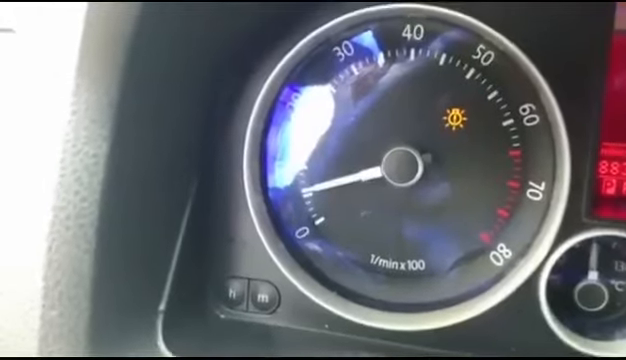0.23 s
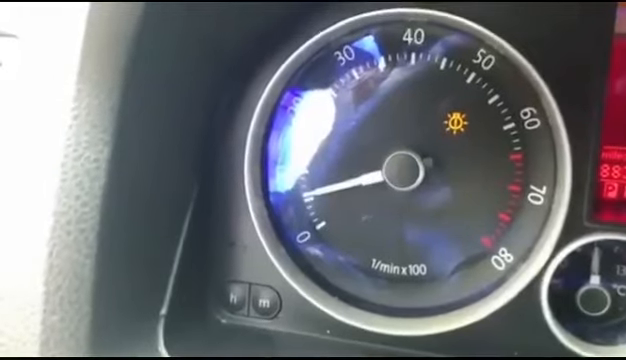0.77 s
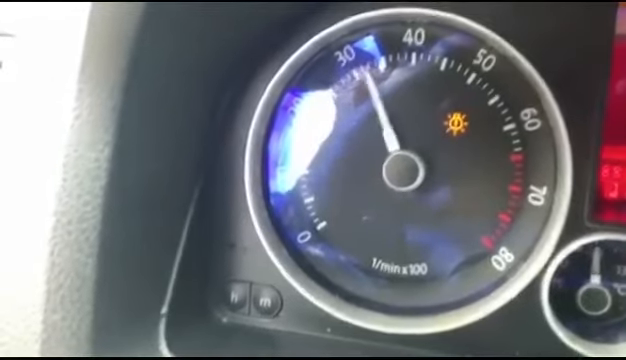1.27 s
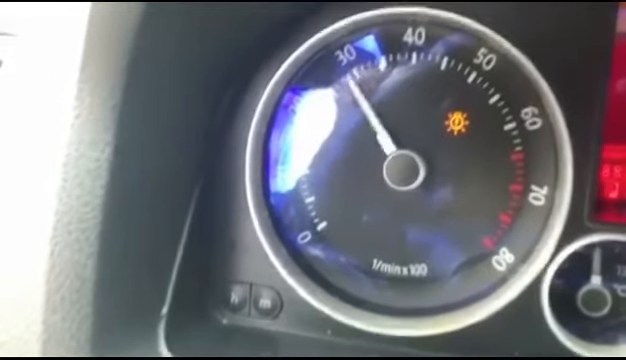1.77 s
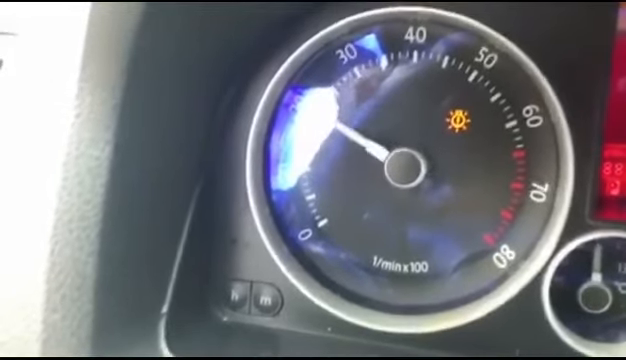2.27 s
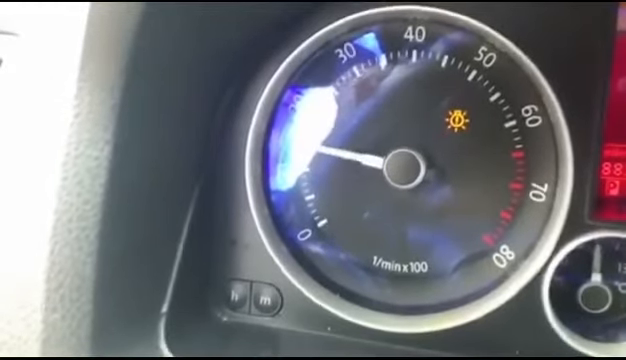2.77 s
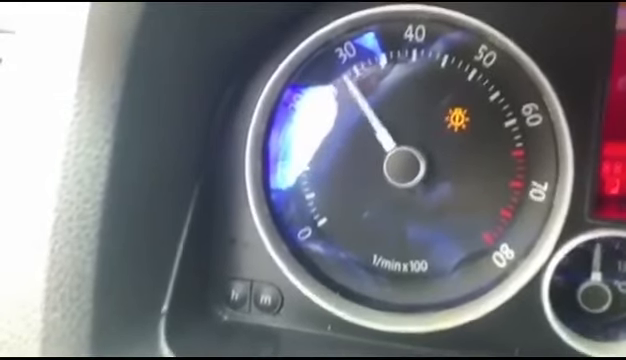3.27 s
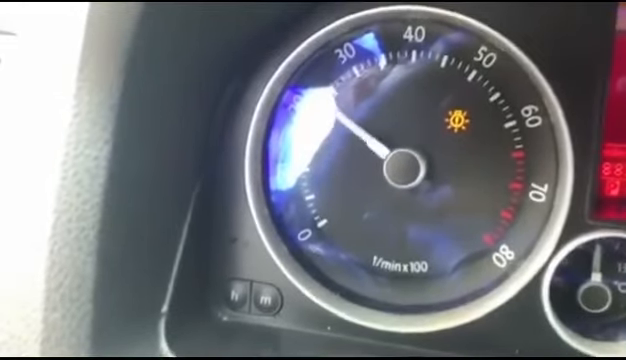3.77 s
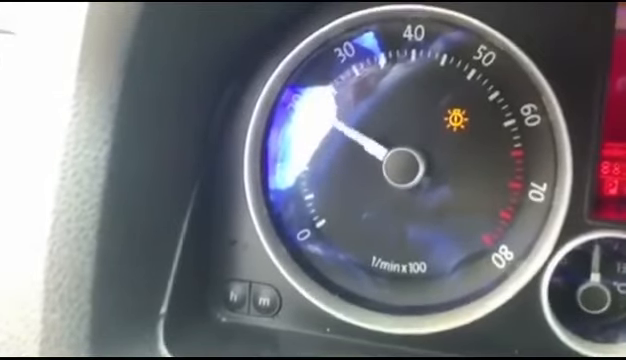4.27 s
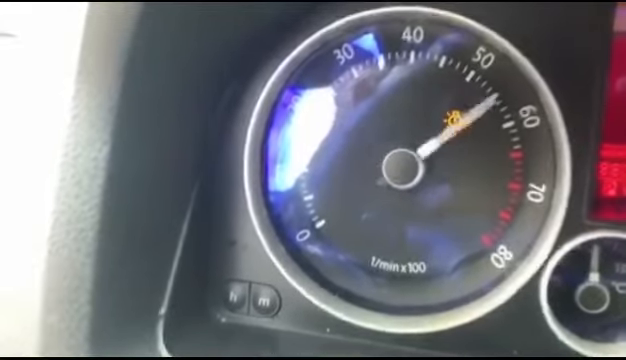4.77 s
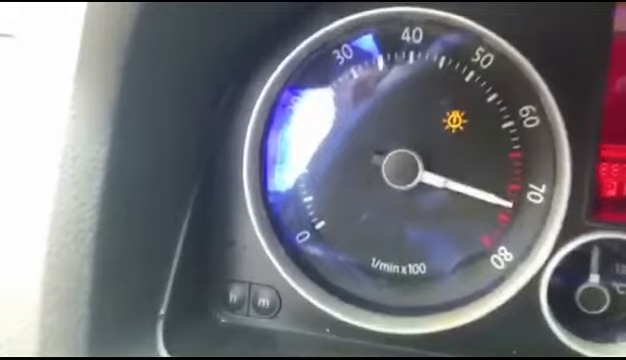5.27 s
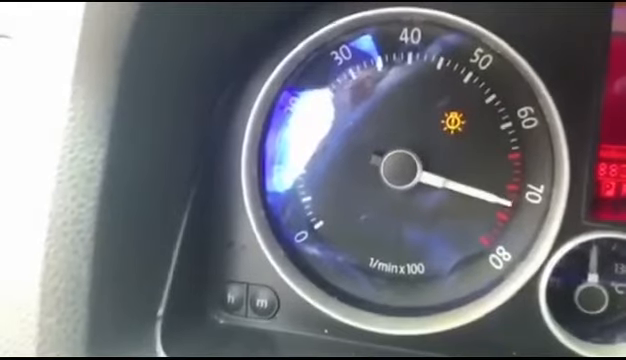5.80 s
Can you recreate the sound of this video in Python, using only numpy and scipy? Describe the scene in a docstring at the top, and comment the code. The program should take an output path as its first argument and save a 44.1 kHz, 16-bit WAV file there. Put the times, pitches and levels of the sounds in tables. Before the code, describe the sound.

Inside a small car cabin, a loud-exhaust six-cylinder engine idles quietly with a low, lumpy bass drone and a soft whirr that fades in the first half second. At about 0.9 s the throttle opens with a faint intake gasp; the note swells and barks up to a raspy peak near 1.4 s, then slides down with dull thumps. At 2.2 s a sharp, bright backfire cracks with a heavy boom. A second, lower blip starts at 3.0 s, peaks around 3.25 s and falls, with soft thuds and a smaller cluster of pops near 3.94 s. From 4.3 s the engine pulls hard, climbing to a loud, high, rasping roar by about 5.1 s. It stays there to the end, fluttering several times a second against the limiter, with bangs and deep thumps around 5.15, 5.34, 5.64 and 5.84 s. The phone microphone rounds the peaks and lacks top treble.

```python
"""First a loud-exhaust six-cylinder car idles around the listener in the driver's seat, under a brief soft whirr.
Two blips follow, then a long pull held at the rev limit to the end. Uneven firings ring the pipe and gas rasps
with them; smooth firing tones and a bass drone fill the cabin, and the intake gasps and growls at each press.
Off throttle and at the limit fuel burns in the exhaust: decaying low tones as soft thumps, noise bursts with
booms as sharp bangs. A phone microphone rounds the peaks and drops the highest treble."""
import sys
import numpy as np
from scipy import signal
from scipy.fft import rfft, irfft, next_fast_len
from scipy.io import wavfile
from scipy.ndimage import uniform_filter1d, map_coordinates

SR = 44100
rng = np.random.default_rng(int(sys.argv[2]) if len(sys.argv) > 2 else 0)


def master_out(mix):
    """Clip the mix to full scale and print it as 16-bit PCM to the path in sys.argv[1]."""
    frames = np.transpose(np.atleast_2d(mix))
    ceiling = np.clip(frames, -1, 1)
    pcm = np.round(ceiling * 32767).astype(np.int16)
    wavfile.write(sys.argv[1], SR, pcm)


N = 266364
T = np.arange(N) / SR


def undb(db):
    """Decibels to gain."""
    return 10 ** (np.asarray(db) / 20)


def unit(x):
    """Scale to rms 1."""
    return x / np.sqrt(np.mean(x ** 2))


def steady(x, size=6000):
    """Hold the running rms at 1, keeping the quick flutter."""
    return x / np.sqrt(np.abs(uniform_filter1d(x * x, size)) + 1e-12)


def walk(rate):
    """Smooth random wander with a spread near 1; a higher rate [Hz] wanders faster."""
    k = max(int(SR / rate), 2)
    once = uniform_filter1d(rng.standard_normal(N), k)
    return unit(uniform_filter1d(once, k))


def drift(x, share, rate):
    """Let the resonances of a noise wander in pitch by the given share."""
    return map_coordinates(x, [np.cumsum(1 + share * walk(rate))], mode="mirror")


def lookup(hz, table):
    """The columns of a table at the given frequencies."""
    at, *columns = np.transpose(table)
    return [np.interp(hz, at, c) for c in columns]


def blend(load, loaded_db, coast_db):
    """Gain of a layer whose level under load takes over from its coasting level."""
    return np.hypot(load * undb(loaded_db), np.clip(1 - load, 0, 1) * undb(coast_db))


def colour(x, points, rings=()):
    """Causal minimum-phase filter with the given spectrum and added narrow resonances."""
    size = 2 * next_fast_len(N // 2 + 16384)
    f = np.arange(size // 2 + 1) * SR / size + 1e-3
    hz, db = np.transpose(points)
    cepstrum = irfft(np.log(undb(np.interp(np.log(f), np.log(hz), db))))
    # folding the cepstrum makes the filter causal
    cepstrum[1:size // 2] *= 2
    cepstrum[size // 2 + 1:] = 0
    peaks = 1 + sum(undb(g) / (1 + 1j * (f * f - c * c) / (f * w)) for c, w, g in rings)
    return irfft(rfft(x, size) * np.exp(rfft(cepstrum)) * peaks)[:N]


def cabin(x, t60, wet_db):
    """Dense, short reflections smear each pulse in time and ripple its spectrum a little."""
    t = T[:SR // 4]
    tail = rng.standard_normal(len(t)) * np.exp(-np.log(1000) * t / t60)
    tail = signal.sosfilt(signal.butter(2, 400, "high", fs=SR, output="sos"), tail)
    size = next_fast_len(N + SR // 2)
    paths = 1 + undb(wet_db) * rfft(tail / np.linalg.norm(tail), size)
    # the square root softens the spectral ripple; the phase keeps the full smear
    ripple = unit(np.abs(paths) ** .5)
    return irfft(rfft(x, size) * ripple * np.exp(1j * np.angle(paths)), size)[:N]


# presses of the pedal: (touched [s], throttle wide [s], top speed reached [s], lifted [s],
# release before each layer's share [s], top firing rate [Hz], gas flow [dB], engine note [dB])
PRESSES = [(0.93, 1.165, 1.378, 1.39, .07, 169, 1.2, -1), (2.99, 3.085, 3.24, 3.255, .155, 144, 1.3, 1),
           (4.29, 4.375, 5.14, 6.1, .1, 358, 0, 0)]
IDLE_HZ, HANG_HZ = 41, 86  # firing rate of the first idle, and where the revs settle after a blip
TIP_IN_HZ_PER_S = 118  # slow rise while the throttle is only cracked open
RUN_DOWN_S_PER_HZ = .0088  # the higher the blip, the longer the run-down


def firing_rate():
    """Each press lifts the revs gently, then steeply and evenly; after the lift the flywheel runs down in an S-curve."""
    hz = np.full(N, float(IDLE_HZ))
    for touched, wide, top_s, lifted, _, top_hz, *_ in PRESSES:
        start_hz = np.interp(touched, T, hz)
        tip_in_hz = start_hz + TIP_IN_HZ_PER_S * (wide - touched)
        climb = np.interp(T, [touched, wide, top_s], [start_hz, tip_in_hz, top_hz])
        run_down = np.clip((T - lifted) / (RUN_DOWN_S_PER_HZ * top_hz), 0, 1)
        after = climb - (top_hz - HANG_HZ) * np.sin(np.pi / 2 * run_down) ** 2
        hz = np.where(T < touched, hz, after)
    return uniform_filter1d(hz, size=1500)


def throttle(strengths_db, attack_s, hold_s, release_share):
    """Load on the engine: it rises with each press, holds a moment past the lift and dies away."""
    total = 0
    for (touched, _, _, lifted, release_s, *_), db in zip(PRESSES, strengths_db):
        rise = np.clip((T - touched) / attack_s, 0, 1)
        fall = np.exp(-np.maximum(T - lifted - hold_s, 0) / (release_share * release_s))
        total = total + undb(db) * rise * fall
    return total


# the gas flow lingers after the lift; the engine note dies sooner
GAS_ATTACK_S, GAS_HOLD_S, GAS_RELEASE_SHARE = 0.14, 0.026, 0.93
NOTE_ATTACK_S, NOTE_HOLD_S, NOTE_RELEASE_SHARE = 0.13, 0.0086, 0.48
BURN_ON_S = .2  # the cylinders go on burning for this long after a lift


def firing_on():
    """Near 1 while a press makes the cylinders burn hard; 0 in the first idle, fading soon after each lift."""
    return throttle([0] * len(PRESSES), GAS_ATTACK_S, BURN_ON_S, 1)


HUNT_S, HUNT_HZ = 5.315, 6.8  # the limiter lets the engine fire fully near this time, and again at this rate


def hunting(cut):
    """The limiter's cycle, deeper as it cuts: positive while the engine fires fully, negative while it cuts."""
    return cut ** 3 * np.cos(2 * np.pi * HUNT_HZ * (T - HUNT_S) + .3 * walk(5))


# cylinders in firing order: (strength [dB], lateness [share of the timing spread])
CYLINDERS = [(3, 0), (-3, 1.2), (-1, -.4), (1, -1.2), (0, .7), (-3, -.3)]


def firings(turns, cut, scatter_db, spread_s):
    """One pulse a firing, each with its own strength and delay; also the strength held over each firing."""
    k = turns.astype(int)
    at = np.flatnonzero(np.diff(k, prepend=-1))
    chance = rng.standard_normal((len(at), 2))
    cylinder = np.arange(len(at)) % len(CYLINDERS)
    strength_db, lateness = np.array(CYLINDERS)[cylinder].T
    # towards the limit the first cylinder weakens, at most by about half
    weakened = 1 - 0.47 * cut[at] * (cylinder == 0)
    size = undb(strength_db + scatter_db * chance[:, 0]) * weakened
    late = np.broadcast_to(spread_s, N)[at] * SR * (lateness + .5 * chance[:, 1])
    pulses = np.zeros(N)
    pulses[np.clip(at + late.astype(int), 0, N - 1)] = size
    return pulses, size[k]


def opening_whirr(hz=1080, width_hz=450, db=-46, fade_s=0.24):
    """Band-passed noise: a soft mid-range whirr dies away in the first moments of the idle."""
    band = signal.lfilter(*signal.iirpeak(hz, hz / width_hz, fs=SR), rng.standard_normal(N))
    return undb(db) * unit(band) * np.exp(-(T / fade_s) ** 2)


# resonances of the tailpipe in the gas stream: (frequency [Hz], width [Hz], level before the flare [dB])
WHISTLES = [(3300, 300, -15), (5430, 130, -16), (7150, 300, -10)]


def whistles(rate=7, flare_db=4):
    """Narrow resonances of the tailpipe flare and fade in the gas stream, each on its own."""
    out = 0
    for hz, width, db in WHISTLES:
        band = signal.lfilter(*signal.iirpeak(hz, hz / width, fs=SR), rng.standard_normal(N))
        out = out + undb(db) * unit(band * undb(flare_db * walk(rate)))
    return out


# exhaust under load, before a trim in the mix: (firing rate [Hz], pipe bark [dB], gas rasp [dB])
LOADED = [(55, -51, -56), (105, -43, -48.5), (125, -33.5, -37.5), (143, -27, -30.5), (156, -24, -30),
          (168, -20.5, -28.5), (200, -26.5, -31), (270, -27, -32), (315, -25.5, -31), (340, -20.5, -28.5)]
# throttle shut, bark and rasp again before the trim:
# (firing rate [Hz], pipe bark [dB], gas rasp [dB], firing tone [dB], its octave [dB])
COASTING = [(42.7, -48.5, -68, -56, -48), (81.4, -48, -59.5, -52.5, -41.5), (108, -46, -55, -39.5, -39),
            (137.5, -39, -55.5, -31.5, -37), (148.5, -42.5, -50.5, -49, -38.5), (170, -34, -49.5, -28, -36)]
LIMIT_BARK_DB, LIMIT_RASP_DB = -4.5, -3.5  # change when the limiter cuts fully


def exhaust_levels(hz, cut):
    """Bark and rasp in dB: both follow engine speed and gas flow, and sag when the limiter cuts."""
    flow_dbs = [flow_db for *_, flow_db, _ in PRESSES]
    flow = throttle(flow_dbs, GAS_ATTACK_S, GAS_HOLD_S, GAS_RELEASE_SHARE)
    bark_db, rasp_db = lookup(hz, LOADED)
    coast_bark_db, coast_rasp_db, *_ = lookup(hz, COASTING)
    bark = blend(flow, bark_db + LIMIT_BARK_DB * cut ** 4, coast_bark_db)
    rasp = blend(flow, rasp_db + LIMIT_RASP_DB * cut ** 4, coast_rasp_db)
    return 20 * np.log10([bark, rasp])


# spectrum of the exhaust pipe: (frequency [Hz], density [dB per Hz])
PIPE = [(170, -31.5), (270, -1.5), (400, -5), (500, -1), (570, -7.5), (760, -9.5), (1000, -5.5),
        (1200, -7.5), (1600, -10), (2000, -12.5), (2600, -11.5), (3000, -20.5), (4000, -23), (8000, -42.5)]
# standing waves of the pipe: (frequency [Hz], width [Hz], level against the spectrum [dB])
PIPE_RINGS = [(288, 30, 3), (340, 30, 0), (410, 50, 0), (670, 60, 6), (840, 45, 0), (1055, 70, -1),
              (1125, 50, -5), (1305, 45, 6), (1440, 60, 1), (1800, 30, -2), (2050, 60, -2), (2710, 40, -6),
              (3040, 60, -5)]
# valve gear and belts under the bonnet: (frequency [Hz], density [dB per Hz])
ENGINE_BAY = [(150, -6), (320, 0), (430, -14), (660, -6), (780, -6), (930, -1), (1150, -4), (1400, -3),
              (2000, -8), (3000, -11), (4000, -18), (8000, -36)]
# spectrum of the rasping gas, shared by the intake's hiss: (frequency [Hz], density [dB per Hz])
RASP = [(900, -6.5), (2200, -15), (3200, -0.5), (4800, -3.5), (6100, -2), (7300, -1.5), (7700, -9.5),
        (8500, -36.5)]
# narrow rings of the body panels: (frequency [Hz], width [Hz], level against the spectrum [dB])
PANEL_RINGS = [(430, 160, 5), (680, 47, -1.5), (970, 54, -6.5), (1340, 49, -3.5)]


def exhaust(hz, turns, cut, hunt):
    """Each firing kicks the pipe and lets out a puff of turbulent gas; overtones flare in the pipe's resonances."""
    bark_db, rasp_db = exhaust_levels(hz, cut)
    # the faster the engine spins, the wider its timing scatters
    spread_s = np.interp(hz, [170, 230, 360], [.00015, .00019, .00032])
    pulses, size = firings(turns, cut, scatter_db=2.2, spread_s=spread_s)
    # the bark holds the overtones; the fundamental travels as a smooth wave of its own
    pulses = pulses - 1.7 * np.mean(size) * hz / SR * np.cos(2 * np.pi * turns)
    puff = 5.4 + np.exp(-(turns % 1) / 0.3)
    gas = np.sqrt(size) * puff * rng.standard_normal(N)
    roar = steady(drift(colour(gas, PIPE, PIPE_RINGS), share=.03, rate=9))
    bark = steady(colour(pulses, PIPE, PIPE_RINGS)) + (.36 + .5 * cut ** 3) * roar
    # off throttle the engine's mechanical whirr takes over from the bark
    voiced = np.clip((bark_db + 46) / 13 * firing_on(), .15, .97)
    bay_noise = colour(rng.standard_normal(N), ENGINE_BAY, PANEL_RINGS)
    whirr = steady(drift(bay_noise, share=.015, rate=5))
    middle = steady(voiced * steady(bark) + (1 - voiced) * whirr)
    rasp = steady(steady(colour(gas, RASP, PANEL_RINGS)) + whistles())
    # the limiter lets the gas out in bursts
    sputter = undb(cut * (walk(25) + 2.2 * walk(110)) - 2 * hunt)
    mix = middle * undb(bark_db + 3.0) * np.sqrt(sputter) + rasp * undb(rasp_db + 1.83) * sputter
    return cabin(mix, t60=.08, wet_db=15)


# how loudly the firing tone and its octave carry into the cabin: (frequency [Hz], level [dB])
CARRY = [(41, -31), (60, -2), (67, -11), (82, -32.5), (104, -18.5), (120, -18), (145, -19.5), (180, -13.5),
         (201, -10), (226, -12.5), (244, -23.5), (295, -22), (345, -12), (410, -18.5), (470, -20),
         (550, -44), (650, -24), (750, -33), (840, -15), (950, -31)]
# how loudly the side tones and overtones carry into the cabin: (frequency [Hz], level [dB])
TONE_CARRY = [(60, -30.5), (100, -38.5), (118, -27), (140, -28.5), (205, -22), (245, -31), (280, -31.5),
              (345, -38), (385, -24), (425, -23.5), (460, -31.5), (495, -39.5), (570, -49), (630, -23),
              (700, -31), (750, -33), (850, -28), (940, -27), (1010, -37), (1500, -53)]
# tones of unequal cylinders under load: (multiple of the cycle rate [ratio], level on top of the carry [dB])
SIDE_TONES = [(2, 0), (3, -3.5), (5, 1.5), (7, 6), (8, -2.5), (9, 1.5), (13, -2.5), (15, -3), (16, -2.5)]
# upper firing harmonics under load: (multiple of the firing rate [ratio], level on top of the carry [dB])
OVERTONES = [(3, -0.5), (4, -4)]
# tones of the lopsided cycle at the full cut: (multiple of the cycle rate [ratio], level [dB])
LOPE = [(1, -24.5), (2, -25), (3, -37), (7, -30), (8, -37.5), (13, -36.5), (16, -52), (18, -37.5),
        (22, -38), (26, -35), (28, -44), (30, -45)]
OCTAVE_DB, LIMIT_NOTE_DB = -12.5, -14  # octave under load; change of the carried tones at the full cut
SIDE_FULL_HZ = 245  # firing rate at which the side tones reach full strength
RAGGED = .28  # quick scatter of the lesser tones, in strength [share] and phase [radians]
COAST_FLUTTER = .5  # extra unsteadiness with the throttle shut


def note(hz, turns, cut, load, hunt):
    """Smooth firing waves swell through the cabin's resonances; at the limit they pulse over a lopsided cycle's tones."""
    def carry_db(multiple, table=CARRY):
        return lookup(multiple * hz, table)[0] + LIMIT_NOTE_DB * cut ** 6

    coasting = np.clip(1 - load, 0, 1)
    overrun_db = -8 * np.clip(1 - firing_on(), 0, 1) * (hz > HANG_HZ)
    _, _, coast_tone_db, coast_octave_db = lookup(hz, COASTING)
    tone_gain = blend(load, carry_db(1.0), coast_tone_db) * (1 + hunt)
    octave_gain = blend(load, carry_db(2.08) + OCTAVE_DB, coast_octave_db + overrun_db)
    tones = [(turns, tone_gain), (2 * turns, octave_gain)]
    cycle = len(CYLINDERS)
    side_rise = load * np.minimum(hz / SIDE_FULL_HZ, 1) ** 3
    for k, db in SIDE_TONES:
        gain = side_rise * undb(carry_db(round(k) / cycle, TONE_CARRY) + db)
        tones.append((round(k) * turns / cycle, gain))
    # the overtones break through between these firing rates [Hz]
    overtone_rise = load * np.interp(hz, (146, 166), (0, 1))
    for k, db in OVERTONES:
        tones.append((round(k) * turns, overtone_rise * undb(carry_db(round(k), TONE_CARRY) + db)))
    for k, db in LOPE:
        tones.append((round(k) * turns / cycle, cut ** 3 * undb(db) * (1 - 0.029 * hunt)))
    out, quick = 0, walk(61)
    for i, (phase, gain) in enumerate(tones):
        # every tone but the firing tone is ragged
        ragged = RAGGED * (i > 0) * (1 - cut ** 3 / 2)
        slow_flutter = (.15 + .12 * cut + COAST_FLUTTER * coasting) * walk(22)
        flutter = np.abs(1 + ragged * np.roll(quick, rng.integers(N)) + slow_flutter)
        slow_waver = (.25 + .15 * cut + .3 * coasting) * walk(30)
        waver = slow_waver + ragged * np.roll(quick, rng.integers(N))
        out = out + gain * flutter * np.sin(2 * np.pi * (phase + rng.random()) + waver)
    return np.sqrt(2) * out


# low resonances of silencer and cabin: (frequency [Hz], density [dB per Hz])
DRONE = [(20, -9.5), (38, -26), (50, 7), (62, 4.5), (85, -4.5), (120, -10.5), (150, -16), (200, -10.5),
         (240, -19.5), (300, -20), (420, -30.5), (800, -67)]
# level at idle, rise per doubling of speed, change under load, change at the full cut
DRONE_DB, DRONE_DB_PER_OCTAVE, DRONE_LOAD_DB, LIMIT_DRONE_DB = -28.5, 2, 2, 3


def drone(hz, turns, cut, load):
    """Uneven combustion shakes the low resonances of silencer and cabin."""
    pulses, _ = firings(turns, cut, scatter_db=5.5, spread_s=0.00091)
    uneven = signal.sosfilt(signal.butter(2, 25, "high", fs=SR, output="sos"), pulses)
    rumble = steady(colour(rng.standard_normal(N), DRONE))
    shake = .7 * steady(colour(uneven, DRONE)) + rumble
    speed_db = DRONE_DB_PER_OCTAVE * np.log2(hz / IDLE_HZ)
    db = DRONE_DB + speed_db + DRONE_LOAD_DB * load + LIMIT_DRONE_DB * cut ** 4
    return steady(shake) * undb(db)


# spectrum of the air box: (frequency [Hz], density [dB per Hz])
AIR_BOX = [(150, -35), (230, -17), (290, 3), (350, 3), (410, -0.5), (520, -11.5), (670, -13), (800, -8.5),
           (1500, -38)]
GROWL_DB, GASP_DB, GASP_LAG_S, GASP_S = -36, -58, .014, .03


def intake(hz, turns, cut, load):
    """Air gasps past the throttle as it opens, and the cylinders' gulps growl in the air box under load."""
    gulps, _ = firings(turns, cut, scatter_db=3, spread_s=.0003)
    growl = steady(cabin(colour(gulps, AIR_BOX), t60=.07, wet_db=9))
    gasp = 0
    for touched, *_ in PRESSES:
        t = np.maximum(T - touched - GASP_LAG_S, 0) / GASP_S
        gasp = gasp + t * np.exp(1 - t)
    hiss = unit(colour(rng.standard_normal(N), RASP))
    return load * undb(GROWL_DB) * growl + gasp * undb(GASP_DB) * hiss


# soft afterburns: (time [s], pitch [Hz], peak level [dB])
THUMPS = [(1.652, 65, -8.5), (1.763, 55.2, -13.5), (2.391, 55, -12), (2.762, 53.3, -17.5),
          (3.562, 133.7, -17.5), (3.649, 54, -8.5), (4.04, 50, -11), (4.138, 53.7, -17),
          (4.247, 51.2, -17.5), (5.126, 62.3, -9.5), (5.164, 61.3, -2.5), (5.702, 60.2, -7),
          (5.813, 56.8, -2)]


def thumps(swell_s=0.045):
    """A slow burn in the silencer swells and dies in the cabin's bass resonance."""
    out = 0
    for s, hz, db in THUMPS:
        t = np.maximum(T - s, 0)
        swell = (t / swell_s) ** 2 * np.exp(1 - (t / swell_s) ** 2)
        out = out + undb(db) * swell * np.sin(2 * np.pi * hz * t)
    return out


# backfires on the overrun and on the limiter: (time [s], crack level [dB], its treble against its body [dB],
# crack decay [s], boom pitch [Hz], boom level before it is halved in the mix [dB])
BANGS = [(2.2114, -15.5, 7, .009, 116, -5), (2.2177, -7.5, 1, 0.018, 67, 3),
         (2.236, -18, 0, 0.01, 114, -10), (2.252, -28, -7, 0.0099, 67.6, 0.5),
         (2.259, -26, 4.5, 0.0062, 193, -11.5), (2.296, -30.5, -12, .008, 65, -6),
         (3.934, -20.5, 4, 0.019, 197, -8.5), (3.942, -25.5, -2, 0.011, 62, -5.5),
         (3.951, -27, -5, 0.014, 130, -11.5), (5.15, -18.5, 4.5, 0.037, 122, -5.5),
         (5.197, -19.5, -13, 0.023, 120, -9), (5.337, -24, -5, .025, 201, -11),
         (5.636, -23, 8, 0.029, 207, -10), (5.843, -18.5, 2, 0.077, 261, -14)]
# spectrum of a crack: (frequency [Hz], density [dB per Hz])
CRACK = [(60, -11), (130, 0), (205, 15.5), (290, 1.5), (420, 1), (680, -3.5), (1000, -1.5), (1500, -9.5),
         (2400, -11.5), (4500, -15), (7300, -15.5), (8500, -24)]
# rings of the silencer under a backfire: (frequency [Hz], width [Hz], level against the spectrum [dB])
SILENCER = [(665, 55, 2), (930, 160, -8), (1390, 90, 9), (1520, 70, 3), (1810, 62, 2)]


def bangs(boom_s=0.011, rise_s=0.00072, tail_s=0.079, tail_db=-25, treble_hz=2200):
    """Fuel explodes in the hot pipe: ragged bright and dull cracks ring the silencer, and the cabin booms."""
    body, edge, boom = 0, 0, 0
    for s, crack_db, treble_db, decay_s, boom_hz, boom_db in BANGS:
        t = np.maximum(T - s, 0)
        decay = np.exp(-t / decay_s) + undb(tail_db) * np.exp(-t / tail_s)
        blast = undb(crack_db) * (1 - np.exp(-t / rise_s)) * decay
        body = body + blast
        edge = edge + blast * undb(treble_db)
        swell = t / boom_s * np.exp(1 - t / boom_s)
        boom = boom + undb(boom_db) * swell * np.sin(2 * np.pi * boom_hz * t)
    gas = rng.standard_normal(N) * undb(2.5 * walk(500) + 1.5 * walk(120))
    low, high = (signal.butter(3, treble_hz, kind, fs=SR, output="sos") for kind in ("low", "high"))
    crack = signal.sosfilt(low, body * gas) + signal.sosfilt(high, edge * gas)
    # the same gas without the blasts sets the reference level
    reference = np.std(colour(gas, CRACK, SILENCER))
    return colour(crack, CRACK, SILENCER) / reference + .5 * boom


# how far the limiter cuts, against engine speed: (firing rate [Hz], depth [0-1])
LIMITER_CUT = [(160, 0), (260, .6), (338, .65), (356, 1)]
HUNT_SWING = .007  # share by which the speed swings as the limiter hunts


def scene():
    """In the driver's seat: one crankshaft drives the engine layers; both channels carry the same sound."""
    hz = firing_rate()
    note_dbs = [note_db for *_, note_db in PRESSES]
    load = throttle(note_dbs, NOTE_ATTACK_S, NOTE_HOLD_S, NOTE_RELEASE_SHARE)
    cut = lookup(hz, LIMITER_CUT)[0]
    hunt = hunting(cut)
    unsteady = HUNT_SWING * hunt + .008 * walk(25) + .005 * walk(70)
    turns = np.cumsum(hz * (1 + unsteady)) / SR  # counts firings
    car = opening_whirr() + exhaust(hz, turns, cut, hunt) + note(hz, turns, cut, load, hunt)
    car = car + drone(hz, turns, cut, load) + intake(hz, turns, cut, load) + thumps() + bangs()
    return np.array([car, car])


TOP_HZ = 7950  # upper edge of the microphone's band


def record(dry):
    """The phone's microphone rounds the loudest peaks and cuts steeply above its band."""
    rounded = dry / (1 + (dry / .83) ** 6) ** (1 / 6)
    return signal.sosfilt(signal.ellip(10, .2, 85, TOP_HZ, fs=SR, output="sos"), rounded)


dry = scene()
out = record(dry)
master_out(out)
```